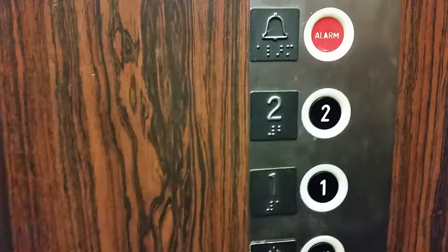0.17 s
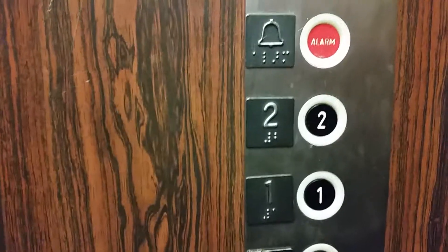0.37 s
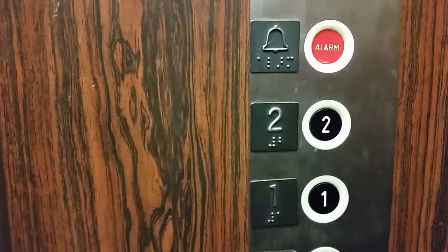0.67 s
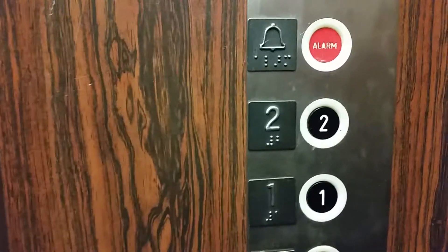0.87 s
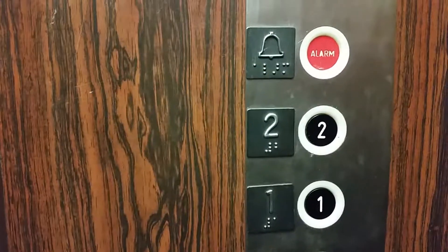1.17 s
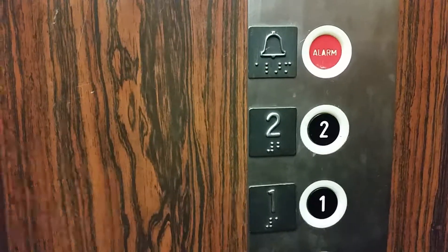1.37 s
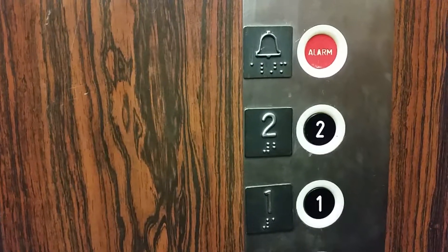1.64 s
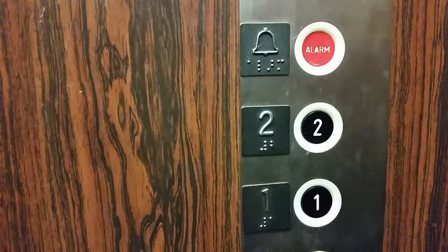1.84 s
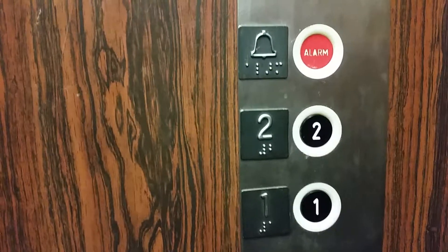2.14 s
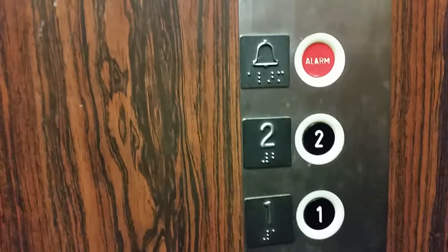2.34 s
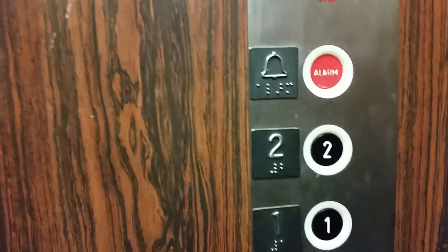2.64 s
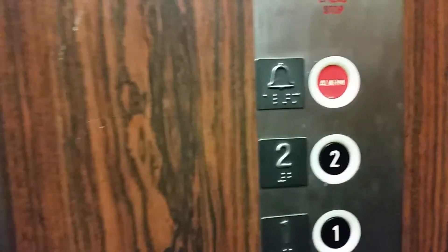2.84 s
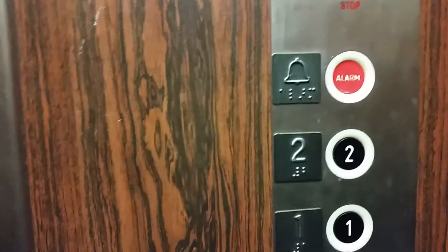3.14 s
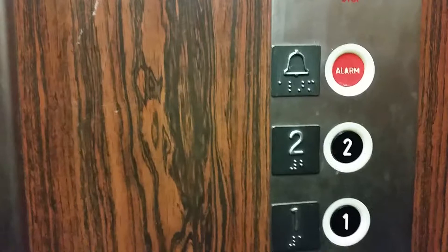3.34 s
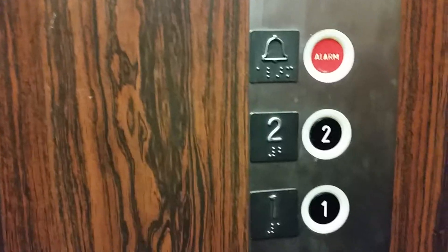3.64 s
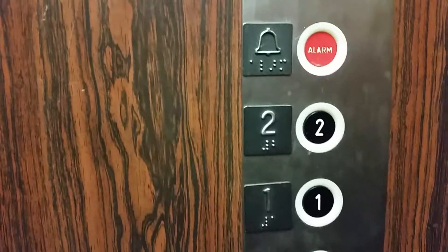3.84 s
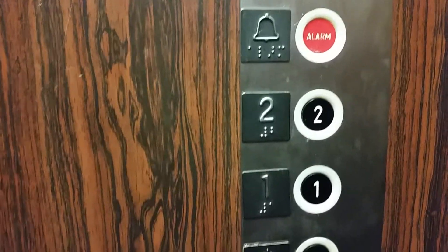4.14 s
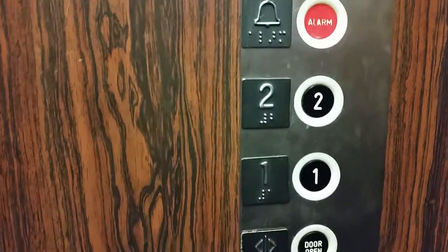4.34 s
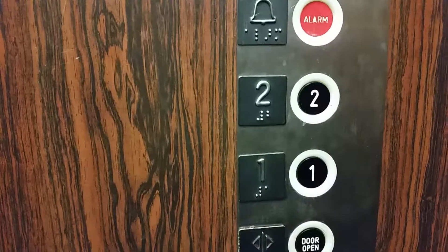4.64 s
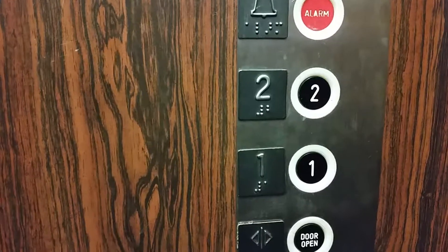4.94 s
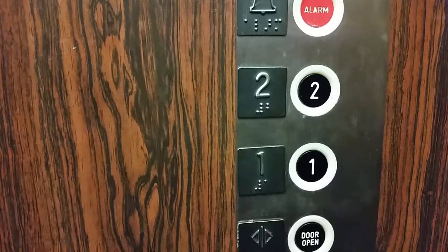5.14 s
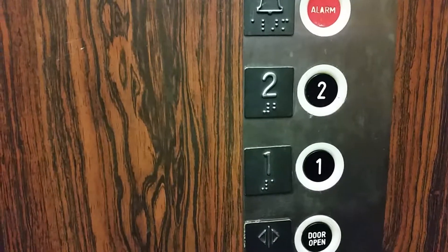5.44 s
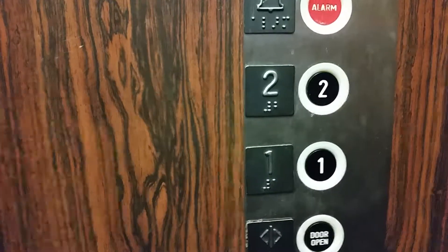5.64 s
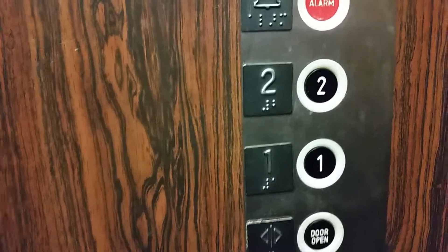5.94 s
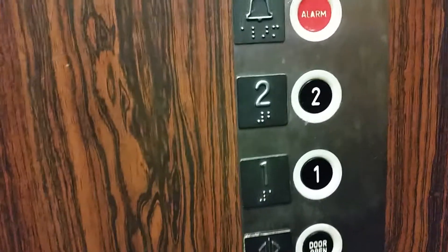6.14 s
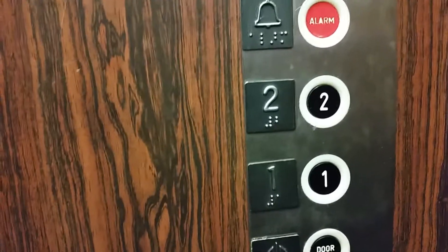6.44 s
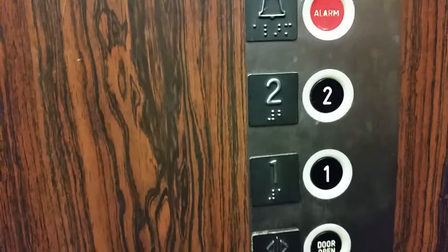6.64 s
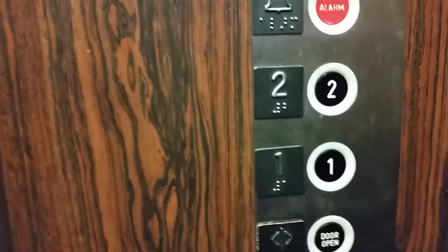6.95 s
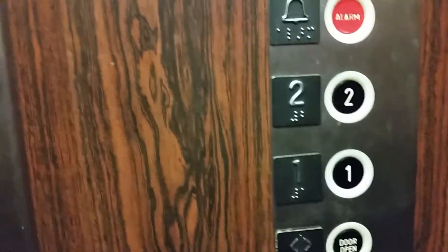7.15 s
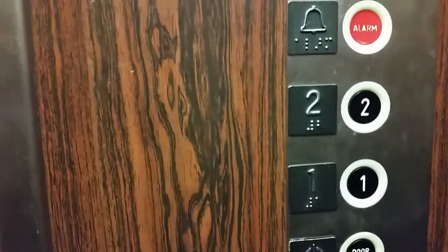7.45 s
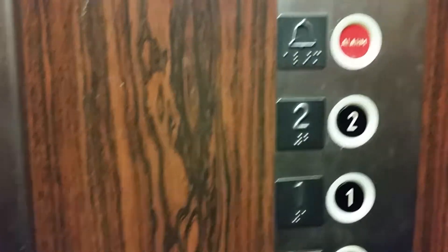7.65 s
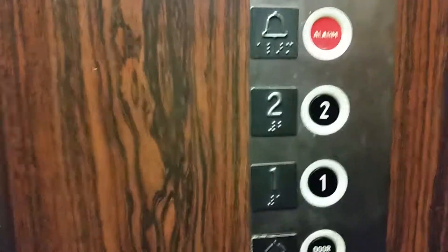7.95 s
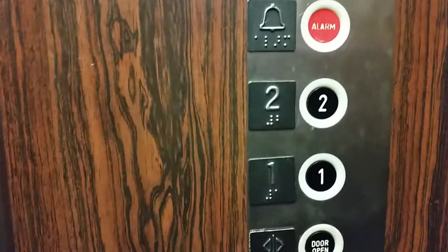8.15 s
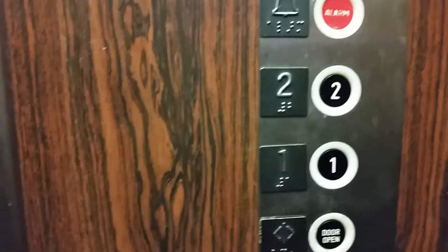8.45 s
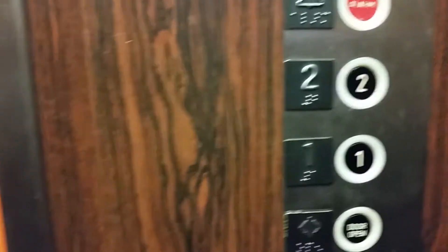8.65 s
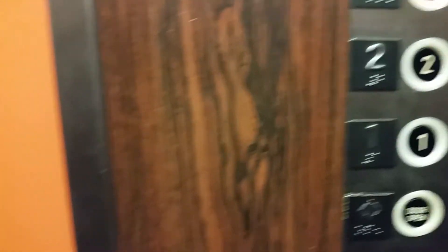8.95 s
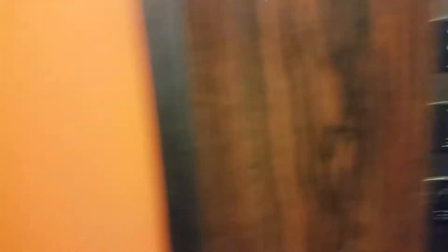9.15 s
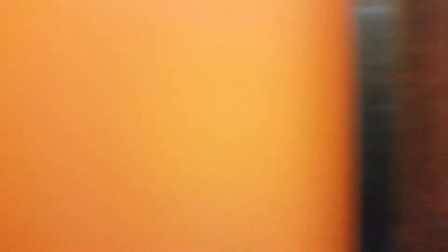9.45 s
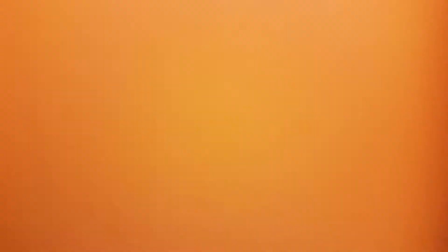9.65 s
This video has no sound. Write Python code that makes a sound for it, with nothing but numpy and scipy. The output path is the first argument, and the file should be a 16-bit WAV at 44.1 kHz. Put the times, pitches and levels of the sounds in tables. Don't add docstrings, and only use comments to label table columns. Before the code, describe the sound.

Inside a small moving elevator, a deep, beating electrical hum and motor drone run throughout over soft boxy air noise. Early on, dull knocks shake the panels, a dry bearing squeaks and a loose part rattles. The middle is steadier, with tiny taps on the handheld microphone's case and a swell of hum. Later, harder knocks and rattles return, then more taps and a faint brush.

```python
import sys
import numpy as np
from scipy import signal
from scipy.fft import rfft, irfft, next_fast_len
from scipy.io import wavfile
from scipy.ndimage import uniform_filter1d

SR = 44100
rng = np.random.default_rng(int(sys.argv[2]) if len(sys.argv) > 2 else 0)


def undo_db(level):
    steps = np.asarray(level, float) / 20
    return 10 ** steps


def materialize(psi):
    bounded = np.clip(np.atleast_2d(psi).T, -1, 1)
    quanta = np.round(bounded * 32767).astype(np.int16)
    wavfile.write(sys.argv[1], SR, quanta)


N = 432621
TIME = np.arange(N) / SR
SIDES = np.array([[.5], [-.5]])
MOTOR_HZ, PULLEY_HZ = 28.511, 8.784

# hz, left_db_per_hz, right_db_per_hz
AIR_SPECTRUM = [(20, -67, -63.5), (65, -65.5, -65), (111, -55, -51), (290, -64.5, -63.5), (760, -70.5, -76),
                (1190, -81, -80), (2610, -83, -87.5), (3120, -90.5, -93.5), (4530, -93, -106),
                (5930, -106, -116), (8270, -118, -119), (9930, -111, -104), (12300, -117, -114),
                (15500, -110, -111)]
# hz, lead_rad
PORT_LEAD = [(30, .12), (120, 0.17), (220, 0.31), (500, 0.86), (1100, 1)]
# start_s, mains_db, motor_order_5_db
HUM_LEVELS = [(0, -25, -29), (1, -25, -24), (1.6, -23, -27), (2.1, -23, -26.5), (2.8, -22.5, -28),
              (3.8, -23, -25.5), (4.5, -17.5, -23.5), (5.4, -19, -23.5), (5.95, -21.5, -31),
              (6.5, -21.5, -25.5), (7.5, -21, -25.5), (8, -22, -24.5), (9, -20.5, -23.5), (9.81, -25, -24)]


def table(rows, hz):
    at_hz, *columns = np.transpose(rows)
    return np.array([np.interp(np.log(hz + 1e-9), np.log(at_hz), c) for c in columns])


def lead_rad(hz):
    return SIDES * table(PORT_LEAD, hz)[0]


def band(x, lo_hz, hi_hz):
    sos = signal.butter(2, [lo_hz, min(hi_hz, .45 * SR)], "bandpass", fs=SR, output="sos")
    return signal.sosfilt(sos, x) / np.sqrt((hi_hz - lo_hz) / SR * 2)


def walk(rate_hz):
    hold = int(SR / rate_hz)
    steps = np.repeat(rng.standard_normal(N // hold + 1), hold)
    return 1.3 * uniform_filter1d(uniform_filter1d(steps, hold), hold)[:N]


def strike(t60_s, rise_s):
    t = TIME[:SR // 2]
    return (1 - np.exp(-t / rise_s)) * np.exp(-np.log(1000) * t / max(t60_s, .002))


def burst(t60_s, rise_s=.001):
    shape = strike(t60_s, rise_s)
    return rng.standard_normal((2, len(shape))) * shape


def ring(hz, t60_s, rise_s):
    return strike(t60_s, rise_s) * np.sin(2 * np.pi * hz * TIME[:SR // 2] + lead_rad(hz))


def ports(x, lo_hz, hi_hz):
    size = x.shape[1]
    hz = np.arange(size // 2 + 1) * SR / size
    edges = 1 / np.sqrt((1 + (lo_hz / (hz + 1)) ** 12) * (1 + (hz / hi_hz) ** 12))
    y = irfft(rfft(x) * edges * undo_db(table(AIR_SPECTRUM, hz)) * np.sqrt(SR / 2), size)
    return y * (TIME[:size] < TIME[size - 1] - .01)


def add(out, start_s, x):
    i = int(start_s * SR)
    out[:, i:i + x.shape[1]] += x[:, :N - i]


def tone(hz, db, pan_db, wander_db=0.):
    phase = 2 * np.pi * (hz * TIME + rng.random()) + lead_rad(hz)
    level_db = db + SIDES * pan_db + wander_db * walk(1.6)
    return np.sqrt(2) * undo_db(level_db) * np.sin(phase)


def air():
    # centre_hz, width_hz, left_db_per_hz, right_db_per_hz
    cab_modes = [(79, 12, -52, -51.5), (122.8, 14, -41, -41.5), (138, 14, -49, -45.5),
                 (165, 49, -55.5, -54.5), (184.1, 11, -52.5, -46.5), (230.2, 8.3, -52, -48.5),
                 (267.1, 5.9, -51.5, -50), (295.5, 5.7, -55, -49.5), (316.5, 20, -65, -59),
                 (362, 32, -60, -59.5), (376.2, 5, -58.5, -53.5), (400.4, 13, -57.5, -51),
                 (500, 51, -60.5, -68.5), (538, 16, -57, -60), (600, 47, -63.5, -67),
                 (694.6, 41, -68.5, -65), (813, 40, -65, -64.5), (886, 30, -65.5, -69.5),
                 (965, 54, -68, -70), (1061, 50, -70, -77), (1340, 9, -87, -79.5), (2140, 220, -81.5, -84),
                 (2480, 300, -85, -83.5)]
    # hz, coherence_0_to_1
    likeness = [(60, 0.9), (130, 0.94), (290, 0.79), (640, 0.6), (1410, 0), (3100, 0), (6820, 0.02),
                (15000, 0)]
    size = next_fast_len(N)
    hz = np.arange(size // 2 + 1) * SR / size
    power = undo_db(table(AIR_SPECTRUM, hz)) ** 2
    for centre_hz, width_hz, *db in cab_modes:
        peak = undo_db(np.array(db))[:, None] ** 2
        power += peak / (1 + ((hz - centre_hz) / width_hz * 2) ** 2) ** 2
    alike = np.sqrt(np.clip(table(likeness, hz)[0], 0, 1))
    shared, *own = rfft(rng.standard_normal((3, size)))
    mix = np.sqrt(alike) * shared * np.exp(1j * lead_rad(hz)) + np.sqrt(1 - alike) * np.array(own)
    return irfft(mix * np.sqrt(power * SR / 2), size)[:, :N] * undo_db(.25 * walk(5))


def brushes():
    # start_s, length_s, centre_hz, level_db, left_minus_right_db
    strokes = [
        (5.8, 0.13, 11200, -70, -16),
        (6.622, .15, 15000, -71.5, 12),
        (9.627, .15, 14660, -66.5, 14.5),
    ]
    out = np.zeros((2, N))
    for start_s, length_s, hz, db, pan_db in strokes:
        x = rng.standard_normal((2, int(length_s * SR)))
        hiss = band(band(x, .94 * hz, 1.05 * hz), .93 * hz, 1.06 * hz) / 5
        add(out, start_s, undo_db(db - 4.5 + SIDES * pan_db) * hiss * np.hanning(x.shape[1]))
    return out


def ticks():
    # start_s, peak_db, mid_treble_db, top_db, left_minus_right_db
    taps = [(1.488, -54.5, -0.5, -18, 0.5), (2.762, -56.5, 2.5, -11, 5.5), (2.833, -48, 4, -19.5, -14.5),
            (3.467, -61, 15.5, -4, -9.5), (4.0433, -56.5, 7, -14.5, -1.5), (4.7836, -58.5, 2.5, -6, -0.5),
            (5.3375, -32.5, -4.5, -18.5, -18.5), (6.603, -57.5, 7, -14.5, -2.5), (7.884, -55.5, 8, -14, 1),
            (9.1627, -56.5, 5.5, -17.5, 2.5), (9.3184, -42.5, 4.5, -36, -18.5), (9.783, -60, 3, -10, 0)]
    # ring_hz, t60_s
    case_modes = [
        (520, 0.021),
        (1600, 0.011),
        (4600, 0.0055),
        (10000, 0.0047),
        (15200, .004),
    ]
    light_db, bounce_s = -50, .0052
    hits = []
    for start_s, db, *rest in taps:
        if db < light_db:
            hits += [(start_s, db - 3, *rest), (start_s + bounce_s, db, *rest)]
        else:
            hits.append((start_s, db, *rest))
    out = np.zeros((2, N))
    for start_s, db, mid_db, top_db, pan_db in hits:
        pan = SIDES * pan_db
        gains_db = [13 + SIDES * 3, 3 + SIDES * -4, mid_db - 2 + SIDES * 3, 0.5 + pan, top_db + 12 + pan]
        for gain_db, (hz, t60_s) in zip(gains_db, case_modes):
            add(out, start_s + 0.00077, undo_db(db + gain_db) * ring(hz, t60_s, rise_s=.0001))
        click_db = db + 77.5 + 0.82 * min(pan_db, 0) + 1.2 * pan
        add(out, start_s + 0.001, ports(undo_db(click_db) * burst(.004, rise_s=.0001), 5000, 16000))
        add(out, start_s + 0.0017, ports(undo_db(db + 47 + pan / 2) * burst(.06), 3000, 16000))
    return out


def knocks():
    # start_s, thud_hz, thud_db, knock_hz, knock_db
    blows = [
        (.03, 222, -30, 1950, -46.5),
        (0.199, 185, -26, 600, -60),
        (1.284, 185, -21.5, 1340, -44),
        (6.67, 165, -24.5, 348, -29.5),
        (7.658, 224, -19, 693, -27.5),
        (8.29, 199, -34, 1710, -56),
        (.88, 135, -26.5, 290, -34.5),
    ]
    # mode_hz, t60_s, level_db
    panels = [(125, 0.3, 3.5), (161.2, 0.79, 2.5), (186, 0.53, 2), (222, 0.48, -2.5), (291, 0.27, 1.5),
              (374, 0.33, -1.5), (485, .2, -9), (660, 0.14, 4.5), (757, 0.083, 2), (899, 0.14, -1),
              (1070, .1, 1), (1240, 0.095, 3), (1390, 0.25, 4), (1670, 0.19, -3), (1950, 0.17, 1.5)]
    # start_s, db_over_air_noise
    clacks = [
        (1.285, 4.5),
        (6.671, 1.5),
        (7.658, 8.5),
        (8.29, 12),
    ]
    out = np.zeros((2, N))
    for start_s, thud_hz, thud_db, knock_hz, knock_db in blows:
        for hz, t60_s, db in panels:
            delay, detune = rng.standard_normal(2)
            thud = undo_db(thud_db - 18 * np.log2(hz / thud_hz) ** 2)
            knock = undo_db(knock_db - 20 * np.log2(hz / knock_hz) ** 2)
            level_db = db + SIDES * (-2.5 + 8.4 * (hz > 450))
            mode = ring(hz * (1 + 0.0091 * detune), t60_s, rise_s=.004)
            add(out, start_s + .006 * abs(delay), (thud + knock) * undo_db(level_db) * mode)
        shudder = band(burst(0.65, rise_s=0.008)[:1], 0.7 * thud_hz, 1.7 * thud_hz)
        add(out, start_s, undo_db(thud_db - 8.5) * shudder)
        rasp = band(burst(0.29, rise_s=0.0021), knock_hz, 1.51 * knock_hz)
        add(out, start_s, undo_db(knock_db - 2) * rasp)
    for start_s, db in clacks:
        add(out, start_s, ports(undo_db(db) * burst(0.25, rise_s=0.01), 770, 13000))
    return out


def rattles():
    # start_s, peak_db, mid_treble_db
    strong = [(0.0314, -53, -7), (0.4388, -51, -6), (0.5754, -47, -13), (0.955, -55.5, -11),
              (1.3041, -44.5, -17), (1.4018, -50.5, -6), (1.6541, -51.5, -8), (2.2228, -52.5, -13.5),
              (6.6952, -55.5, -10.5), (7.665, -45, -14), (7.6894, -50, -13), (8.2918, -53.5, -7),
              (8.3189, -55.5, 0.5)]
    turn_db, turn_mid_db, settle_s = 5.5, 6.5, 6
    shakes = list(strong)
    for i, turn_s in enumerate(np.arange(.063, N / SR, .5 / PULLEY_HZ)):
        level, delay = rng.standard_normal(2)
        extra = np.exp(-turn_s / settle_s) * (i % 2 == 0)
        db = -57.5 + 2.2 * level - .8 * turn_s + turn_db * extra
        shakes.append((turn_s + .008 * delay, db, -22 + turn_mid_db * extra))
    shake, jingle = np.zeros((2, 2, N))
    for start_s, db, mid_db in shakes:
        x = burst(.2, rise_s=0.0033)
        add(shake, start_s, undo_db(db + 62 + SIDES * -9) * x)
        add(jingle, start_s, undo_db(db + mid_db + 70 + SIDES * 2.4) * x)
    return ports(shake, 8800, 11600) + ports(jingle, 5000, 8000)


def squeaks():
    # start_s, pitch_hz, peak_db, attack_s, fall_db_per_s
    bites = [
        (.228, 4490, -46.5, 0.034, 125),
        (.421, 4740, -56.5, .016, 20.5),
        (.511, 4730, -59, .018, 289),
        (.562, 4730, -63, .013, 99.5),
        (1.13, 4470, -46.5, .04, 85),
    ]
    hard_db, hard_waver, soft_waver, steady_s = -52, .045, .022, .12
    hold_s, longest_s = 0.013, .09
    dry = np.zeros((2, N))
    bite = 0.14 * np.exp(-np.maximum(TIME - .232, 0) / 0.016)
    for start_s, hz, db, attack_s, fall_db_per_s in bites:
        since_s = TIME - start_s
        waver = hard_waver if db > hard_db else soft_waver
        waver = waver * (1 + np.exp(-np.maximum(since_s, 0) / steady_s)) / 2
        pitch_hz = hz * (1.005 + bite + waver * np.clip(walk(800), -1.8, 1.8))
        phase = 2 * np.pi * np.cumsum(pitch_hz) / SR
        sound = undo_db(SIDES * 10 + 3.5) * np.sin(phase)
        sound += undo_db(-12 + SIDES * -7 + 4.5) * np.sin(2 * phase)
        after_s = np.maximum(since_s - attack_s - hold_s, 0)
        fall_db = -fall_db_per_s * after_s - 89 * np.maximum(after_s - longest_s, 0)
        shape = np.clip(since_s / attack_s, 0, 1) ** 1.3 * undo_db(fall_db)
        dry += sound * shape * undo_db(db + 0.83 * walk(55) + 1.5)
    dry = signal.sosfilt(signal.butter(3, [6500, 8600], "bandstop", fs=SR, output="sos"), dry)
    cab = burst(0.1)
    cab /= np.sqrt(np.sum(cab ** 2, axis=1, keepdims=True))
    return signal.fftconvolve(dry, cab, axes=1)[:, :N]


def pulley():
    orders = [2, 3, 6, 7, 9, 12, 17, 18, 21]
    # level_db, left_minus_right_db
    levels = [(-59.5, -3), (-50.5, -0.5), (-53, -5), (-58, -4.5), (-42, -7), (-43, -3), (-56, -4),
              (-45.5, 2), (-49.5, -3.5)]
    # start_db, growth_db_per_s, dead_spot_s, dead_spot_spacing_s, echo_share_0_to_1
    echoes = [
        (-42, 0.2, 9.2, 15, 0.7),
        (-44, 0, 5.2, 14, 1),
        (-43, 0.45, 5, 7.8, 0.5),
    ]
    out = np.zeros((2, N))
    for order, (db, growth, dead_s, spacing_s, echo) in zip((4, 9 / 2, 5), echoes):
        turn = np.exp(2j * np.pi * (TIME - dead_s) / spacing_s)
        standing = np.abs(1 - min(echo, .95) * turn)
        out += standing * tone(order * PULLEY_HZ, db + growth * TIME, -2.5)
    for order, (db, pan_db) in zip(orders, levels):
        out += tone(order * PULLEY_HZ, db, pan_db, wander_db=2.5)
    return out


def motor():
    orders = [3, 4, 6, 8, 9, 10, 11, 12, 13, 15, 17, 19, 20, 22, 25, 30, 32, 35, 44, 45, 46]
    # level_db, left_minus_right_db
    levels = [(-44, -3), (-53.5, 3.5), (-48.5, -4.5), (-43.5, 2), (-52, -9), (-49, -1.5), (-51.5, -5),
              (-55, -8.5), (-59.5, -1.5), (-65, 1.5), (-61.5, 11), (-59, 0.5), (-57, 11.5), (-68.5, -0.5),
              (-64.5, -2), (-60.5, -5), (-62, 4.5), (-74, 5), (-61.5, 5.5), (-75.5, 1.5), (-68.5, 0)]
    # centre_s, length_s, change_db
    flares = [(1.146, 0.12, 7.5), (2.65, 0.14, 8), (3.25, 0.1, 9.5), (3.47, 0.084, -15), (4.5, 0.31, 6.5),
              (5.2, 0.17, 8), (5.6, 0.13, 7.5), (6.246, 0.3, 4), (6.904, 0.2, 6.5), (8.652, 0.084, 8.5),
              (9.298, 0.63, 5), (9.72, 0.13, -19)]
    at_s, _, fifth_db = np.transpose(HUM_LEVELS)
    out = tone(5 * MOTOR_HZ, np.interp(TIME, at_s, fifth_db), -1.4)
    out += tone(MOTOR_HZ, -41, -2.5, wander_db=1.5)
    flare_db = sum(db * np.exp(-((TIME - s) / length_s) ** 2) for s, length_s, db in flares)
    out += tone(14 * MOTOR_HZ, -44 + flare_db + 2 * walk(7), -1.4)
    for order, (db, pan_db) in zip(orders, levels):
        out += tone(order * MOTOR_HZ, db, pan_db, wander_db=2.5)
    return out


def mains_hum():
    at_s, mains_db, _ = np.transpose(HUM_LEVELS)
    return tone(119.936, np.interp(TIME, at_s, mains_db), -1.9)


def scene():
    background = air() + brushes() + ticks() + knocks()
    return background + rattles() + squeaks() + pulley() + motor() + mains_hum()


def band_limit(x):
    return signal.sosfilt(signal.butter(12, 17000, fs=SR, output="sos"), x)


def record(dry):
    top_hz, edge = 15830, SR // 20
    size = next_fast_len(N + SR // 10)
    longer = np.pad(dry, ((0, 0), (edge, size - N - edge)), "reflect")
    passed = np.arange(size // 2 + 1) * SR / size < top_hz
    kept = irfft(rfft(longer) * passed, size)[:, edge:edge + N]
    return band_limit(kept)


dry = scene()
out = record(dry)
materialize(out)
```